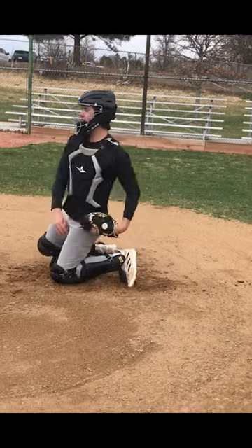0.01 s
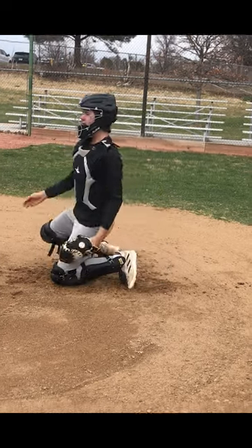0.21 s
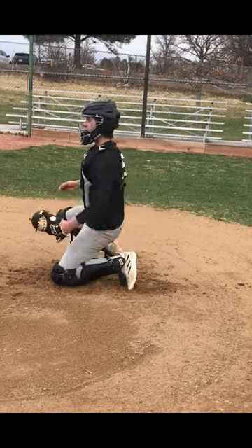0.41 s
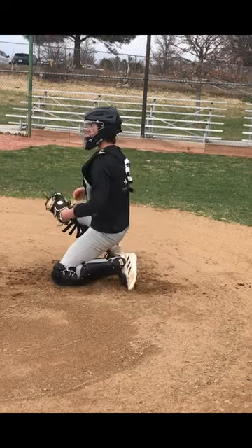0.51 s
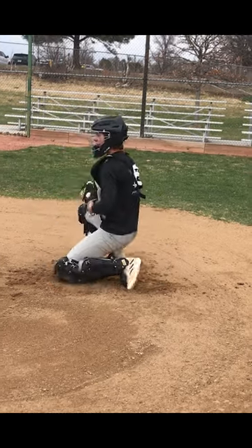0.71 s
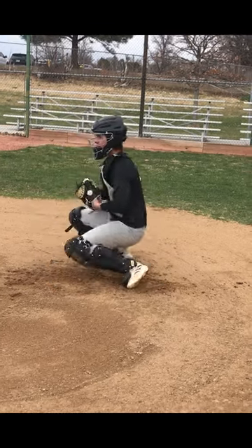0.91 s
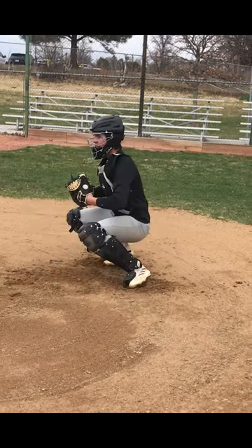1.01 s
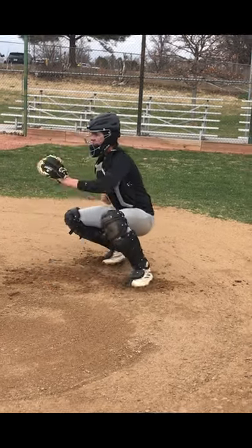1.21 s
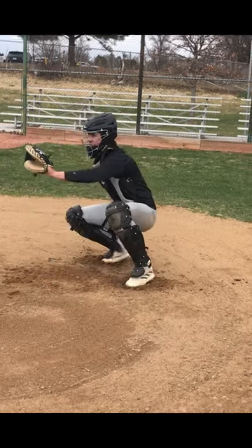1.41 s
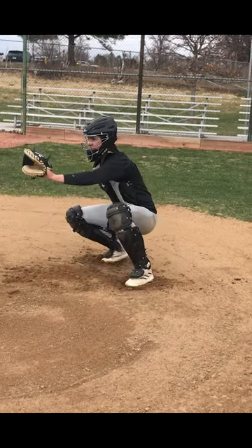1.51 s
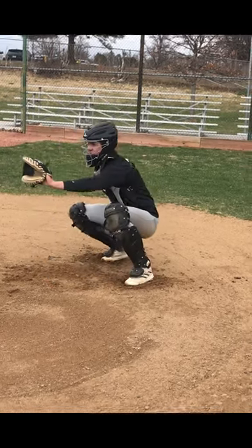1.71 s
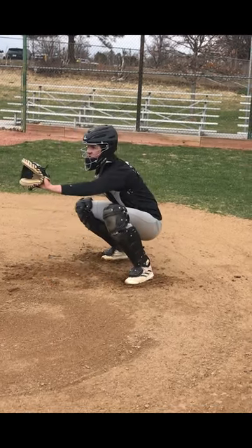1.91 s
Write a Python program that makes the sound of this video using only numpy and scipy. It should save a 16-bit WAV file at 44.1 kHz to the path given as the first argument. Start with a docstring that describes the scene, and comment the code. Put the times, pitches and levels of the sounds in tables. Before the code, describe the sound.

Hard leather smack of a caught baseball, brief plastic gear rattle, faint scuffs, low wind rumble

```python
"""Ball into a mitt on an open field

A baseball pops into a leather mitt close by: noise crack plus two blows on damped modes, with echoes by convolution.
A catcher's gear clacks (clicks, ringing shells, rattle) and his weight thuds as he shifts into a crouch on the dirt.
Shoes and clothes scrape: clumped grains under short swells.
Low wind on the microphone, distant traffic and an airy treble are shaped noise."""
import sys
import numpy as np
from scipy import signal
from scipy.fft import rfft, irfft
from scipy.io import wavfile

SR = 44100
rng = np.random.default_rng(int(sys.argv[2]) if len(sys.argv) > 2 else 0)


def persist_wave(psi):
    """Save psi, clipped to +-1, as 16-bit WAV."""
    counts = np.round(np.clip(psi, -1, 1) * 32767).astype(np.int16)
    wavfile.write(sys.argv[1], SR, np.atleast_2d(counts).T)


N = 88200
TIME = np.arange(N) / SR


def amp(db):
    """Decibels to gain."""
    return 10 ** (np.asarray(db) / 20)


def unit(x):
    """Scales to rms 1."""
    return x / np.sqrt(np.mean(x ** 2) + 1e-20)


def colour(x, points, tilt_db_per_octave=0):
    """Causal minimum-phase filter of unit mean power gain; the tilt acts above the second point."""
    size = 2 * len(x)
    octave = np.log2(abs(np.fft.fftfreq(size, 1 / SR)) + 1)
    hz, db = np.transpose(points)
    point_octave = np.log2(hz)
    spectrum_db = np.interp(octave, point_octave, db)
    spectrum_db = spectrum_db + tilt_db_per_octave * np.maximum(octave, point_octave[1])
    gain = unit(amp(spectrum_db))
    # the Hilbert transform of the log gain gives the minimum phase
    response = np.exp(np.conj(signal.hilbert(np.log(gain + 1e-9))))
    return irfft(rfft(x, size) * response[:size // 2 + 1])[:len(x)]


def decay(start_s, t60_s):
    """Sudden start, exponential fall of 60 dB per t60."""
    return (TIME >= start_s) * amp(-60 * np.maximum(TIME - start_s, 0) / t60_s)


def swell(peak_s, rise_s, fall_s):
    """Exponential rise to a peak of 1 and exponential fall, by time constants."""
    return np.exp(-np.maximum((peak_s - TIME) / rise_s, (TIME - peak_s) / fall_s))


def drift(hz):
    """Slow random signal of rms 1 with a Gaussian roll-off at the given rate."""
    rolloff = np.exp(-(np.fft.rfftfreq(N, 1 / SR) / hz) ** 2)
    return unit(irfft(rfft(rng.standard_normal(N)) * rolloff, N))


def fizz():
    """White noise of even strength: random signs."""
    return rng.choice([-1., 1.], N)


def ring(start_s, modes):
    """A blow on a set of damped modes; neighbours swing in opposite directions."""
    total = np.zeros(N)
    for k, (hz, db, t60_s) in enumerate(modes):
        sine = np.sin(2 * np.pi * hz * (TIME - start_s))
        total += (-1) ** k * amp(db) * decay(start_s, t60_s) * sine
    return total


def grains():
    """Dense tiny clicks of uneven size, in clumps as surfaces catch and slip."""
    grains_per_s, spread_db = 8000, 3
    clump_db, clump_hz = 2.1, 120
    size_db = spread_db * np.minimum(rng.exponential(1, N), 4) + clump_db * drift(clump_hz)
    present = rng.random(N) < grains_per_s / SR
    return unit(amp(size_db) * fizz() * present)


def outdoors():
    """Lumpy wind on the microphone, distant traffic and a faint airy treble, all filtered noise."""
    # Wind spectrum. Each row: Hz, dB per Hz (relative).
    wind_colour = [(15, -34), (28, -21.5), (45, -4), (65, 0), (110, 0), (170, -6.5), (260, -12.5),
                   (400, -18.5), (900, -47), (3000, -66)]
    # Wind level over time. Each row: time in seconds, offset in dB.
    wind_offset = [(0, 2.5), (.3, -2.5), (.5, -1), (.75, 2), (1, -0.5), (1.35, 2), (1.6, 0.5), (2, 1.5)]
    # Traffic spectrum. Each row: Hz, dB per Hz (relative).
    wash_colour = [(100, -10), (280, -2.5), (470, -12.5), (650, -1), (900, 1.5), (1250, -6.5), (1600, -15),
                   (2000, -21), (2400, -27.5), (3500, -28), (5000, -33.5), (7000, -34.5), (9000, -31.5),
                   (10500, -36), (16000, -39)]
    # Airy treble level. Each row: time in seconds, level in dB.
    air_level = [(0, -57.5), (.05, -60.5), (.2, -64.5), (.5, -65.5), (1.0, -70), (1.2, -72.5), (1.4, -70),
                 (1.65, -81), (1.8, -69), (2, -90)]
    # Airy treble spectrum. Each row: Hz, dB per Hz (relative).
    air_colour = [(400, -4.5), (1300, 6), (2000, 2.5), (2700, -4.5), (4000, -6.5), (5000, -16.5),
                  (7000, -11.5), (9000, -17.5), (16000, -28.5)]
    base_wind_db, gust_rms_db, gust_hz = -52, 1.56, 10
    base_wash_db, wash_swell_rms_db, wash_swell_hz = -54.5, .5, 5.5

    wind_db = base_wind_db + np.interp(TIME, *np.transpose(wind_offset))
    wind_db = wind_db + gust_rms_db * drift(gust_hz)
    wind = colour(rng.standard_normal(N) * amp(wind_db), wind_colour)

    wash_db = base_wash_db + wash_swell_rms_db * drift(wash_swell_hz)
    wash = colour(rng.standard_normal(N) * amp(wash_db), wash_colour)

    air_db = np.interp(TIME, *np.transpose(air_level))
    air = colour(rng.standard_normal(N), air_colour) * amp(air_db)
    return wind + wash + air


def mitt():
    """The ball cracks on the leather, then seats in the pocket: two blows in quick succession."""
    # Damped modes of the pocket. Each row: Hz, relative level in dB, t60 in seconds.
    pocket = [(203, -12, 0.022), (670, -0.8, 0.01), (930, -2, 0.011), (1350, -5, 0.0088),
              (2070, -20.5, 0.01), (2646, -21.5, 0.014), (3690, -35, 0.015), (4050, -25.5, 0.0098),
              (4600, -16.5, 0.0031), (5640, -22, 0.0082), (6580, -34, 0.011), (7330, -26.5, .0156)]
    # Leather crack spectrum. Each row: Hz, dB per Hz (relative).
    crack_colour = [(300, -21), (1500, -3), (3000, -3.5), (5500, -2.5), (8500, -9), (10000, -26),
                    (16000, -23)]
    touch_s, body_db = .2468, -7
    seat_delay_s, seat_re_touch_db = .0013, 3
    crack_db, crack_t60_s = -22.5, 0.011

    touch = ring(touch_s, pocket)
    seat = amp(seat_re_touch_db) * ring(touch_s + seat_delay_s, pocket)
    crack = colour(fizz() * decay(touch_s, crack_t60_s), crack_colour)
    return amp(crack_db) * crack - amp(body_db) * (touch + seat)


def field(pop):
    """Slaps from fence and stands, near scatter and a faint far tail, convolved with the pop."""
    # Slaps. Each row: delay in seconds, level in dB, tilt in dB per octave.
    echoes = [(0.0179, -16.5, 4.5), (.0191, -18.5, 2), (.0638, -29.5, -1)]
    # Slap spectrum before tilt. Each row: Hz, dB per Hz (relative).
    echo_colour = [(100, -10), (220, 6), (600, -11.5), (950, -3), (1400, 0), (2000, 11), (3000, 4),
                   (5000, -4), (7000, -2), (8500, 9.5), (16000, 0)]
    # Diffuse tail spectrum. Each row: Hz, dB per Hz (relative).
    tail_colour = [(80, -1), (250, 12), (500, -18), (900, 1), (1600, 8), (2500, 6.5), (4500, 6), (8000, 7),
                   (11000, 14), (16000, 12)]
    near_db, near_start_s, near_t60_s = -11, 0.0017, 0.048
    far_db, far_start_s, far_t60_s = -23, 0.03, 0.65

    slaps = np.zeros(N)
    for delay_s, db, tilt in echoes:
        impulse = np.sinc((TIME - delay_s) * SR)  # allows fractional-sample delay
        slaps += amp(db) * colour(impulse, echo_colour, tilt)

    near = amp(near_db) * unit(fizz() * decay(near_start_s, near_t60_s))
    far = amp(far_db) * unit(fizz() * decay(far_start_s, far_t60_s))
    tail = colour(near + far, tail_colour) / np.sqrt(N)  # rms to total energy
    return signal.fftconvolve(pop, slaps + tail)[:N]


def gear():
    """Shin guards and straps clack: noise clicks, briefly ringing plastic shells and a loose rattle."""
    # Clacks. Each row: start in seconds, click level in dB, shell ring level in dB, click t60 in seconds.
    clacks = [(0.325, -50, -52, 0.0039), (0.3298, -43, -63, 0.0078), (0.334, -25.5, -46, 0.0028),
              (0.3369, -36, -45, 0.0098), (0.3429, -38, -55, 0.0126), (0.347, -28.5, -43.5, 0.0064),
              (.3530, -43.5, -49, 0.01), (0.3566, -45, -46, 0.0082), (0.3683, -32.5, -43.5, 0.0089),
              (.3708, -40.5, -35.5, 0.013), (0.3766, -47, -57, .006), (.493, -58, -64, 0.016),
              (.600, -55, -66, 0.0079)]
    # Plastic shell modes. Each row: Hz, relative level in dB, t60 in seconds.
    shell_modes = [(252, -4, 0.051), (710, -7, 0.075), (932, -4, 0.092), (1310, -10, 0.034),
                   (2080, -8.5, 0.044), (2810, 1.5, 0.018), (3600, -3.5, 0.013)]
    # Rattles. Each row: peak time in seconds, level in dB, rise in seconds, fall in seconds.
    rattles = [(0.351, -46, 0.011, 0.015), (.388, -55.5, 0.0088, 0.0092)]
    # Click and rattle spectrum. Each row: Hz, dB per Hz (relative).
    gear_colour = [(60, -6), (280, 9.5), (480, -17.5), (750, 8.5), (1300, 7.5), (2100, 0), (2450, -2.5),
                   (2900, -4.5), (4500, -7), (6000, -6), (8600, -6.5), (10200, -22), (12000, -21),
                   (16000, -37)]

    click_envelope, shells = np.zeros(N), np.zeros(N)
    for start_s, click_db, shell_db, t60_s in clacks:
        click_envelope += amp(click_db) * decay(start_s, t60_s)
        shells += amp(shell_db) * ring(start_s, shell_modes)
    rattle_envelope = sum(amp(db) * swell(s, rise, fall) for s, db, rise, fall in rattles)

    clicks = fizz() * click_envelope
    rattle = grains() * rattle_envelope
    return colour(clicks + rattle, gear_colour) + shells


def thuds():
    """Weight lands on the dirt under the clacks: blows on damped low and middle modes."""
    # Landings. Each row: start in seconds, level in dB.
    landings = [(0.3372, -37.5), (.357, -45.5), (0.3802, -44), (.388, -48)]
    # Ground modes. Each row: Hz, relative level in dB, t60 in seconds.
    ground = [(57, -4.5, .12), (120, -8, .06), (280, 0.5, 0.031), (886, -4, 0.037)]
    return sum(amp(db) * ring(start_s, ground) for start_s, db in landings)


def scrapes():
    """Shoes scrape the grit and cloth rubs: filtered grains in short strokes."""
    # Shoe strokes. Each row: peak time in seconds, level in dB, rise in seconds, fall in seconds,
    # tilt in dB per octave.
    strokes = [(0.496, -64.5, 0.0068, 0.0066, 3.5), (.63, -67, 0.09, 0.083, -1.5),
               (.727, -51.5, 0.033, 0.032, -1.5), (1.205, -65, 0.0089, 0.015, 4.5),
               (1.48, -62.5, 0.026, 0.016, -5), (1.489, -53, 0.0012, 0.0024, -3)]
    # Grit spectrum before tilt. Each row: Hz, dB per Hz (relative).
    grit_colour = [(300, -15), (1200, -7), (2000, 0), (2600, -2), (3100, -2.5), (4200, -1.5), (4900, -7),
                   (6500, -4.5), (7800, -7), (9000, -2), (12000, -7), (16000, -17)]
    # Cloth rustles. Each row: peak time in seconds, level in dB, rise in seconds, fall in seconds.
    rustles = [(0.459, -58.5, 0.017, 0.0087), (.495, -60, 0.007, 0.01), (0.727, -50.5, 0.0055, 0.011),
               (.85, -63.5, 0.047, 0.21), (1.476, -65.5, 0.023, 0.017)]
    # Cloth spectrum. Each row: Hz, dB per Hz (relative).
    cloth_colour = [(400, -14), (1000, -3), (1800, 6), (2600, -2), (3100, -6.5), (4000, -11.5), (5000, -22),
                    (16000, -38)]

    grit = np.zeros(N)
    for peak_s, db, rise_s, fall_s, tilt in strokes:
        stroke = grains() * swell(peak_s, rise_s, fall_s)
        grit += amp(db) * colour(stroke, grit_colour, tilt)
    rubbing = sum(amp(db) * swell(s, rise, fall) for s, db, rise, fall in rustles)
    return grit + colour(grains() * rubbing, cloth_colour)


def scene():
    """Everything at one microphone."""
    pop = mitt()
    return (outdoors() + pop + field(pop) + gear() + thuds() + scrapes())[None]


def record(dry):
    """The recorder's band limit: a linear-phase low-pass."""
    edge_hz = 15800
    lowpass = signal.firwin(511, edge_hz, window=("kaiser", 9), fs=SR)
    return signal.oaconvolve(dry, lowpass[None], "same")


dry = scene()
out = record(dry)
persist_wave(out)
```